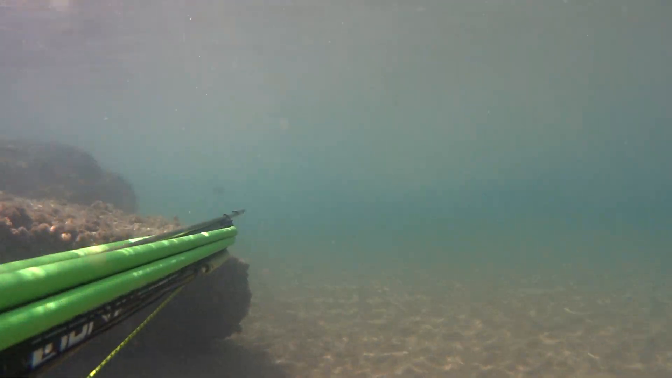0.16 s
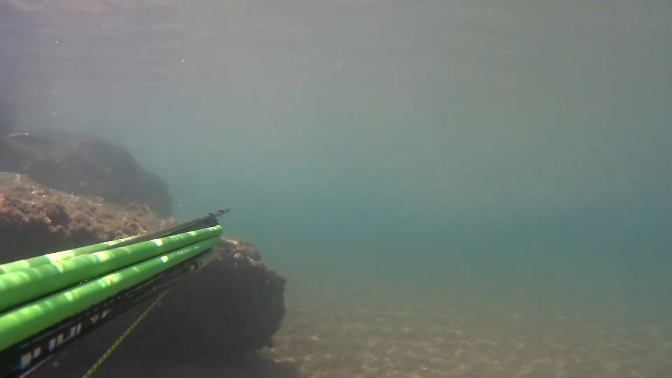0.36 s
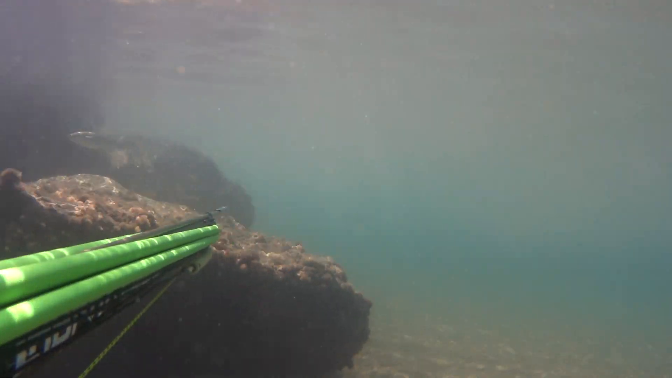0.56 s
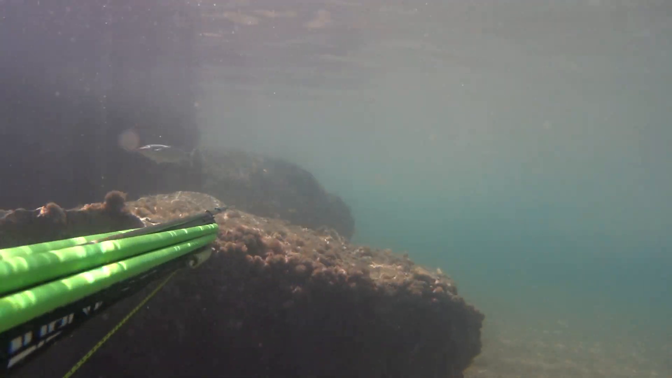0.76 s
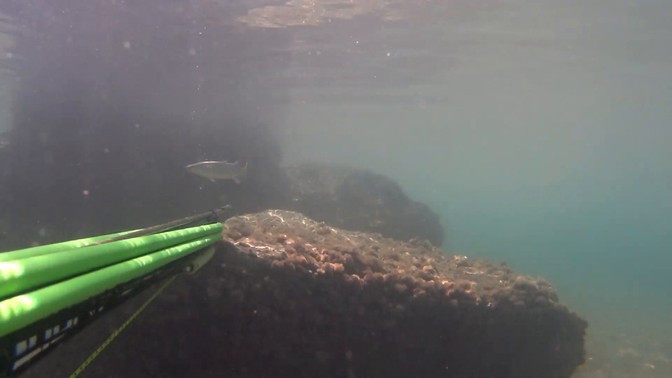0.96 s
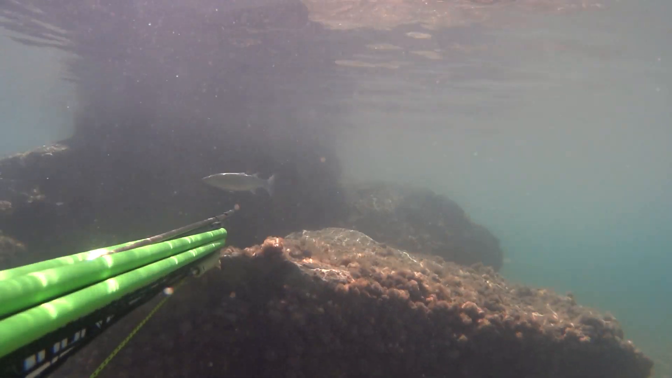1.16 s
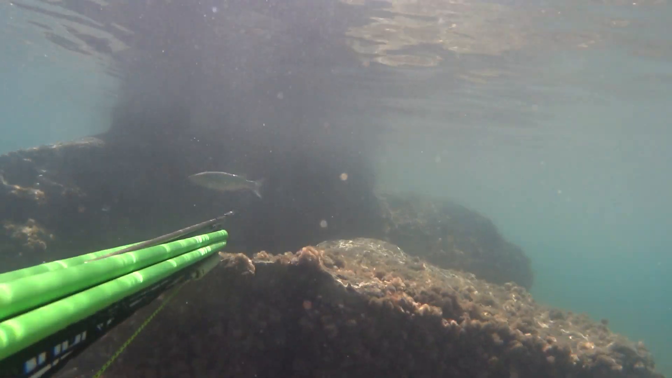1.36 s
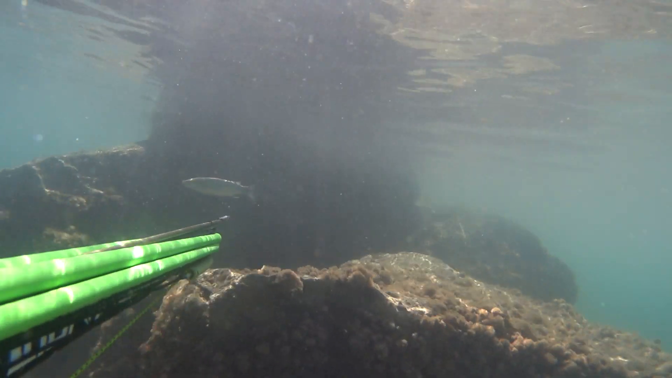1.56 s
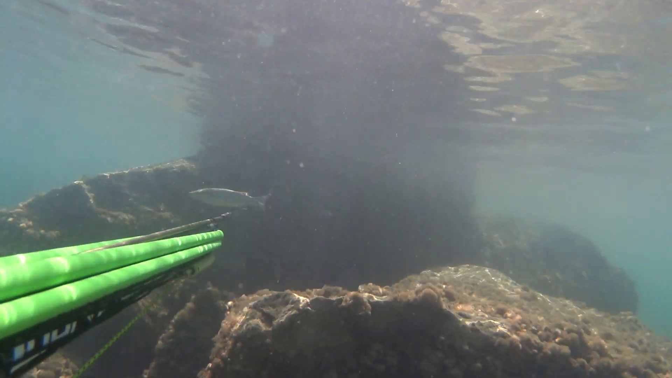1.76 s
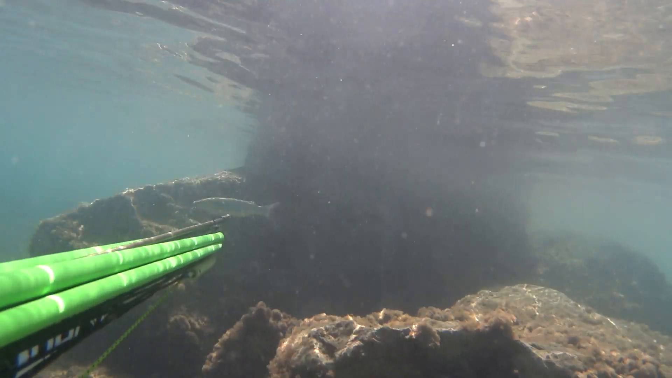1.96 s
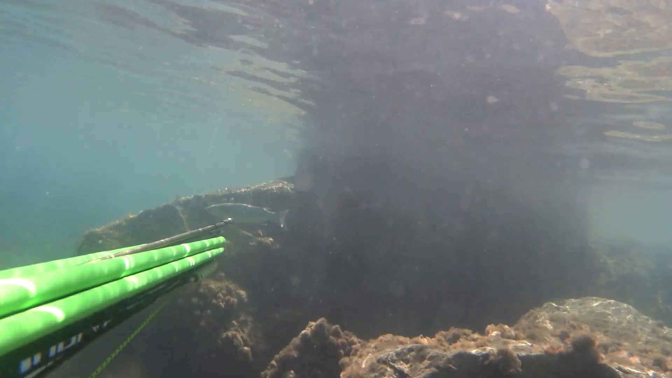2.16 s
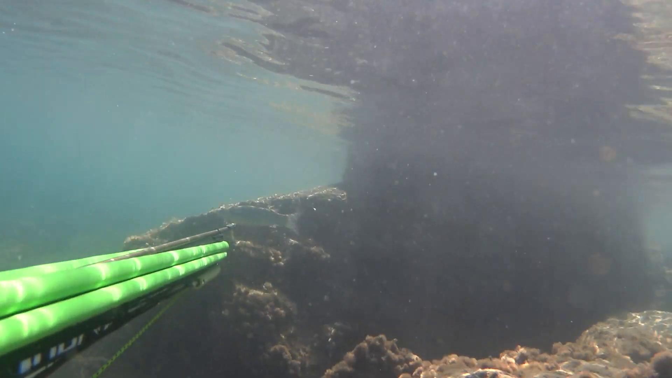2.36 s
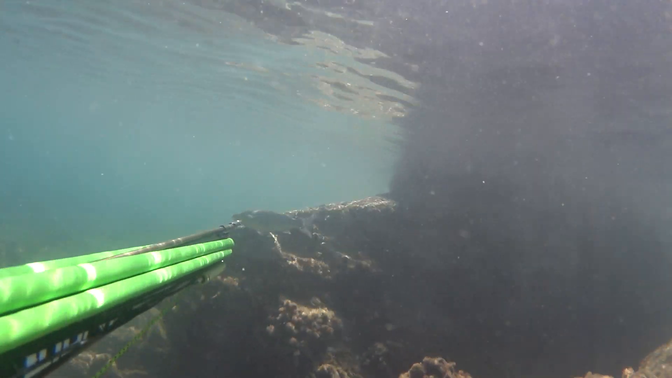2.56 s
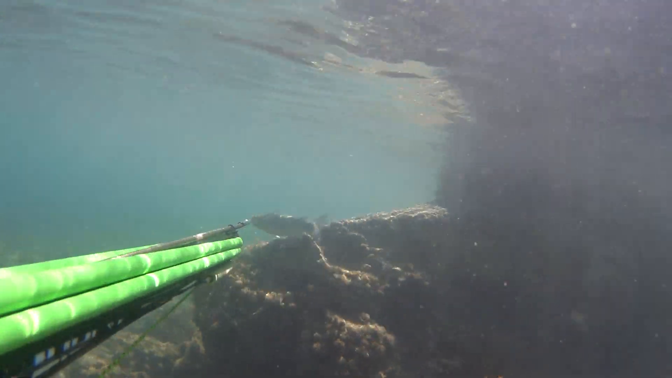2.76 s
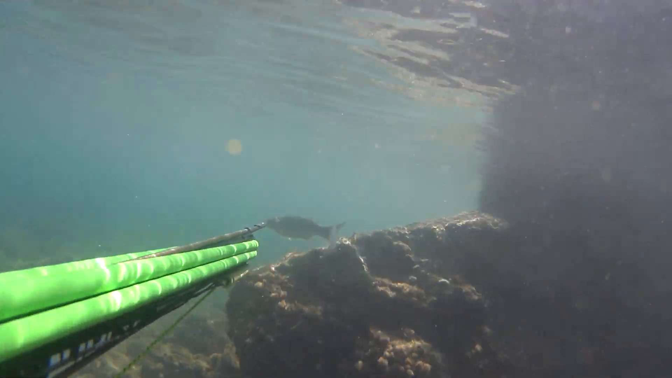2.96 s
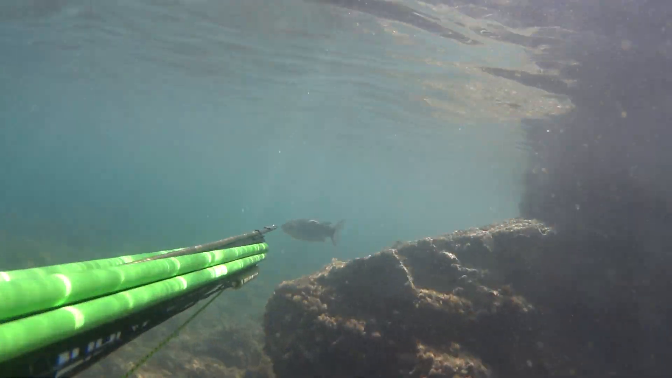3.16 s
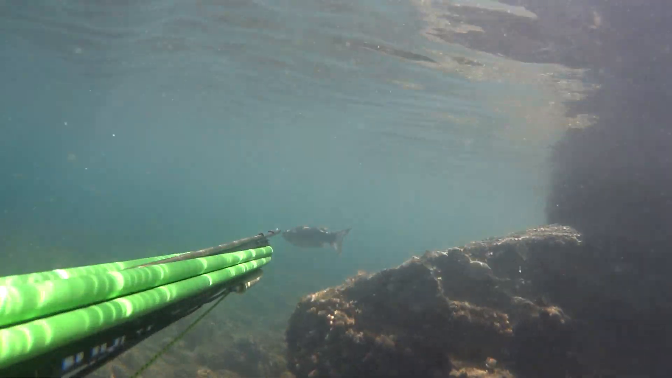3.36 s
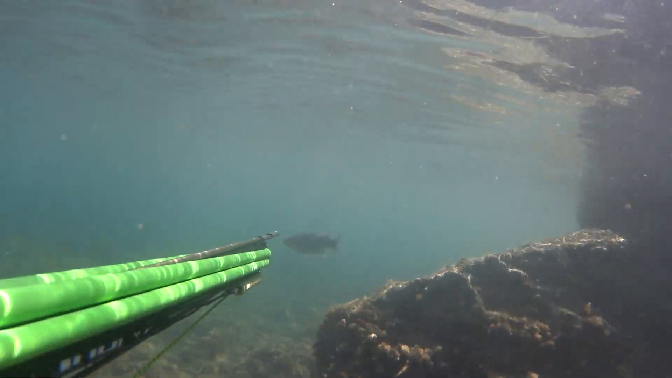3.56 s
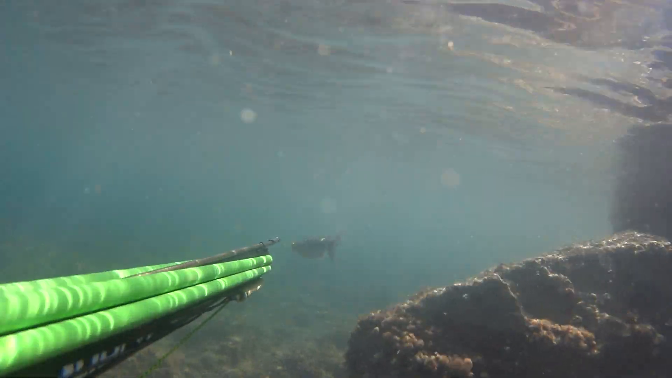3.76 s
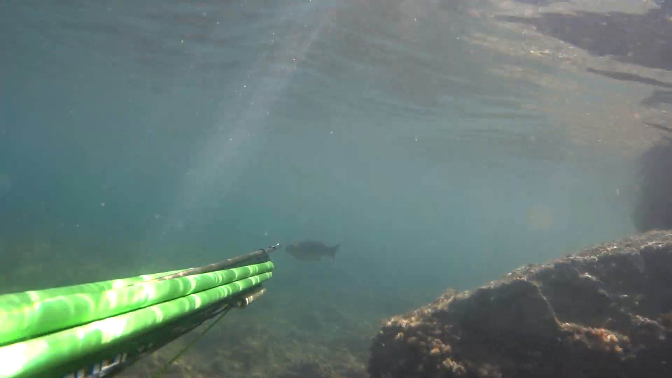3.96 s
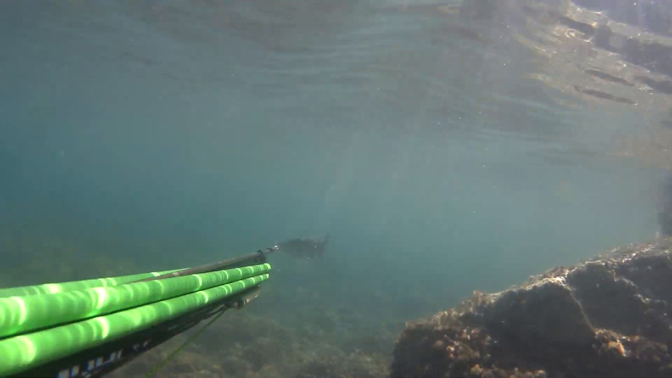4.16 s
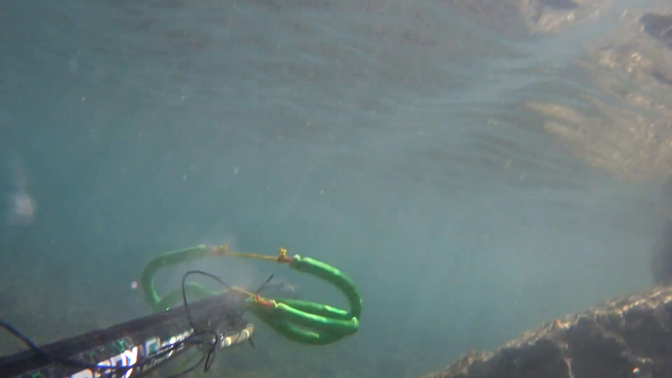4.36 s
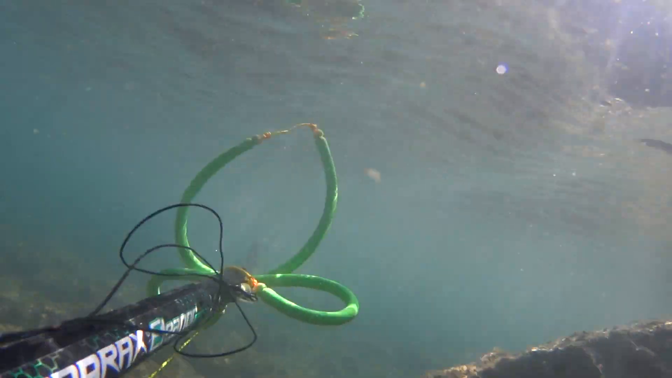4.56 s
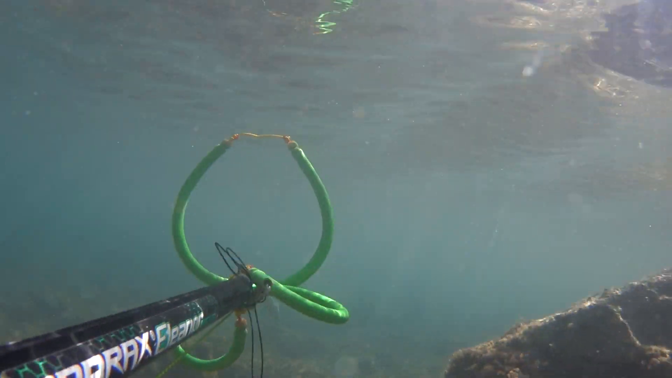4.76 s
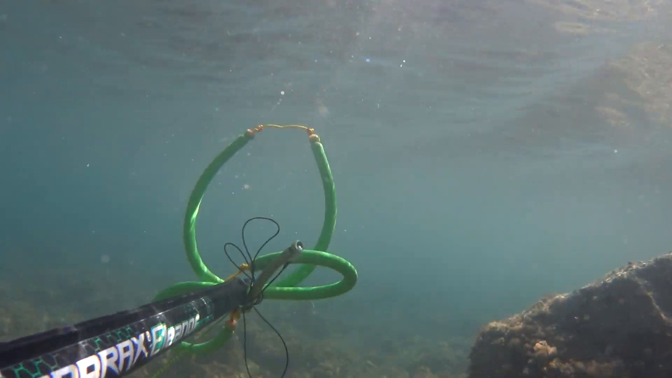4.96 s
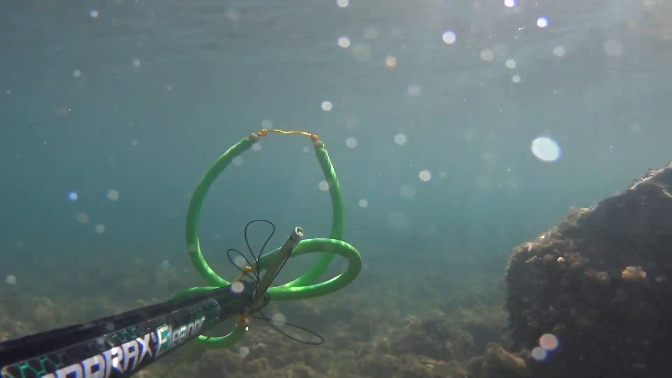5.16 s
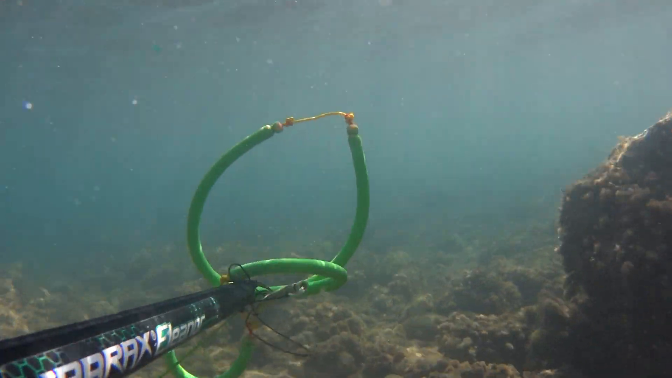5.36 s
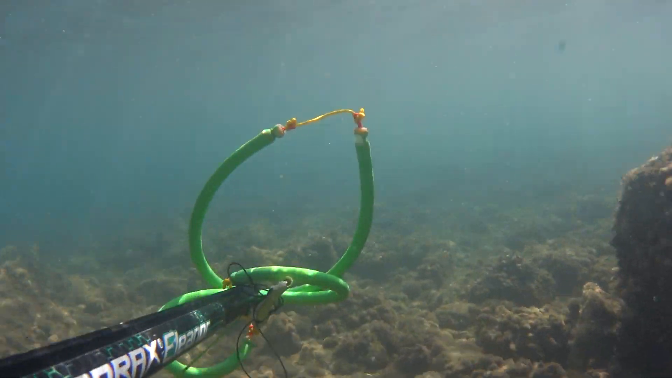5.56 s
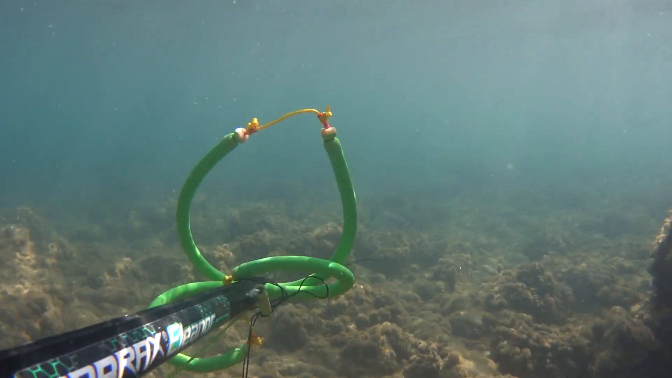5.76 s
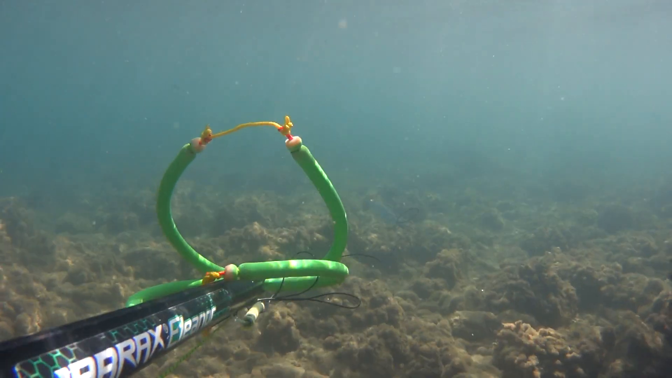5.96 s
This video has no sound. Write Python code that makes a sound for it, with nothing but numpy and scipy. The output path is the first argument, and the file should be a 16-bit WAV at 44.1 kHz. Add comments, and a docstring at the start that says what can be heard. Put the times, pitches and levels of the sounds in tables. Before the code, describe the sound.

Quiet shallow sea hiss and light handling rubs, a sudden hard speargun blast at mid-length, a second sharp snap, then loose knocks and rubbing.

```python
"""A rubber-band speargun is aimed and fired in shallow sea, heard from a waterproof housing fixed to the gun.
Over a steady hiss with faint sizzle (shaped noise and impulses), the grip rubs, and ticks and knocks ring damped modes.
The trigger clicks; the bands drive the shaft in a burst of churned water, rail rattle and collapsing cavities.
The line runs out ever louder and brighter, then snaps taut: it jerks the muzzle and leaves the steel ringing.
Knocks, hard contacts and handling of the slack gun follow."""
import sys
import numpy as np
from scipy import signal
from scipy.fft import rfft, irfft, next_fast_len
from scipy.io import wavfile

SR = 44100
rng = np.random.default_rng(int(sys.argv[2]) if len(sys.argv) > 2 else 0)


def put_to_file(sound):
    """Save the sound as 16-bit audio at rate SR, in the file named by the first command-line argument."""
    columns = np.atleast_2d(sound).T  # one column per channel
    safe = np.clip(columns, -1, 1)
    whole_steps = np.round(safe * 32767)
    wavfile.write(sys.argv[1], SR, whole_steps.astype(np.int16))


N = 265482

# resonances of the gun and its mount: pitch_hz, level_db, t60_s, phase_between_ports_rad
STOCK = [(135, -23, 0.11, 1.72), (257.8, -8, 0.12, 2.76), (319.8, -12.5, 0.083, .8),
         (431, -3.5, 0.036, 1.5), (509, -3.5, 0.045, 2.66), (666, -0.5, 0.034, 1.93),
         (777.4, 1.5, 0.031, 1.93)]
# resonances of the housing wall: pitch_hz, level_db, t60_s, phase_between_ports_rad
WALL = [(1005, -4.5, .014, 1.7), (1194, -3, 0.016, 1.72), (1360, 0, 0.025, 1.1), (1505, -10.5, 0.02, 1.5),
        (1765, -20, 0.024, 1.6)]
# spectrum of cavitation, cracks and scrapes: frequency_hz, level_db
FIZZ = [(1060, -31), (1800, -0.5), (2050, -5), (2380, -7.5), (3040, -13), (3450, -9), (4080, -14.5),
        (4970, -11), (5560, -13), (6090, -16.5), (11000, -33), (14300, -67), (22000, -120)]
# stereo width of moving water: frequency_hz, side_over_mid_db
THRUST_SIDE = [(40, -15), (70, -4.5), (150, -1.5), (300, -0.5), (600, 3), (1000, 2)]
FIRE_S = 4.344  # the shaft starts to move
TOP_HZ = 11150  # upper band limit, also the smallest cavities of the crackle


def amp(db):
    """Level: decibels become an amplitude ratio."""
    return 10 ** (np.asarray(db) / 20)


def unit(x):
    """Normalisation: x is brought to rms 1."""
    return x / np.sqrt(np.mean(x ** 2) + 1e-20)


def clock(length):
    """Time base: seconds since the start of a sound that is length samples long."""
    return np.arange(length) / SR


def along(points, hz):
    """Interpolation of (frequency, value) points on a logarithmic frequency axis."""
    f, v = np.transpose(points)
    return np.interp(np.log(hz + 1), np.log(f + 1), v)


def filtered(x, response):
    """Linear filtering: the spectrum of x is multiplied by a response of frequency."""
    size = x.shape[-1]
    padded = next_fast_len(size + 8192)
    spectrum = rfft(x, padded) * response(np.fft.rfftfreq(padded, 1 / SR))
    return irfft(spectrum, padded)[..., :size]


def coloured(x, spectrum):
    """Spectral shaping: x is weighted by the given spectrum and brought to rms 1."""
    return unit(filtered(x, lambda hz: amp(along(spectrum, hz))))


def wide(pair, spectrum, side):
    """Mid-side stereo: two unrelated signals become left and right of given spectrum and width, at rms 1."""
    mid = filtered(pair[0], lambda hz: 1 / np.sqrt(1 + amp(along(side, hz)) ** 2))
    diff = filtered(pair[1], lambda hz: 1 / np.sqrt(1 + amp(-along(side, hz)) ** 2))
    return coloured(np.array([mid + diff, mid - diff]), spectrum)


def add(out, start_s, sound, pan_db=0):
    """Superposition: a sound is mixed in at its start; positive pan favours the left."""
    start = round(start_s * SR)
    part = (sound * amp([[pan_db / 2], [-pan_db / 2]]))[:, :N - start]
    out[:, start:start + part.shape[1]] += part


def placed(start_s, sound):
    """Superposition on silence: the sound alone, from its start."""
    out = np.zeros((2, N))
    add(out, start_s, sound)
    return out


def decay(t, t60):
    """Exponential damping: the amplitude falls by 60 dB in t60 seconds."""
    return np.exp(-np.log(1000) * t / t60)


def burst(age, attack, hold, t60, slope_db=0):
    """Attack, hold and decay: rises from age 0, holds while changing by slope_db a second, then dies away."""
    held = np.clip(age - attack, 0, hold)
    after = np.maximum(age - attack - hold, 0)
    return np.clip(age / attack, 0, 1) * amp(slope_db * held - 60 * after / t60)


def swell(age, rise, fall):
    """Exponential growth to 1 at age 0 and exponential ebb, with time constants in seconds."""
    return np.exp(-np.maximum(-age / rise, age / fall))


def ring(modes, attack=0.00061, vary_db=2, detune=.03):
    """Modal synthesis: one blow swells into damped modes, peak 1, each reaching the two ports out of step."""
    t = clock(SR // 6)
    out = np.zeros((2, len(t)))
    for hz, db, t60, lag in modes:
        size, shift, start = rng.standard_normal(3)
        phase = start + np.array([[-lag / 2], [lag / 2]])
        mode = np.sin(2 * np.pi * hz * (1 + detune * shift) * t + phase)
        out += amp(db + vary_db * size) * decay(t, t60) * mode
    out *= (1 - np.exp(-t / attack)) ** 2
    return out / np.abs(out).max()


def tilted(modes, db_per_octave):
    """Contact hardness: a harder blow excites the upper modes more, a softer one less."""
    return [(hz, db + db_per_octave * np.log2(hz / modes[0][0]), t60, lag) for hz, db, t60, lag in modes]


def grains(rate, spread_db, size=N):
    """Random point process: impulses at a mean rate per second, of uneven size and sign."""
    out = np.zeros(size)
    at = np.flatnonzero(rng.random(size) < rate / SR)
    signs = np.sign(rng.random(size)[at] - .5)
    out[at] = signs * amp(spread_db * rng.standard_normal(size)[at])
    return out


def chatter(modes, rate, spread_db, size, count=5):
    """Convolution of blows with modes: dense small impacts at several spots on one body, rms 1."""
    total = np.zeros((2, size))
    for _ in range(count):
        blows = grains(rate / count, spread_db, size)[None]
        total += signal.oaconvolve(blows, ring(modes), axes=1)[:, :size]
    return unit(total)


def rubbing(stock, wall, scrape_db, rate, spread_db):
    """Friction by tiny catches: hand or line slips along the gun and rings stock and wall at the given gains."""
    size = len(stock)
    scrape = coloured(np.array([grains(10 * rate, 4, size) for port in range(2)]), FIZZ)
    wall_sound = chatter(WALL, rate, 2.5, size) + amp(scrape_db) * scrape
    return stock * chatter(STOCK, rate, spread_db, size) + wall * wall_sound


def flow(speed):
    """Flow noise: a low swirl of water round the moving housing follows its speed."""
    # frequency_hz, level_db
    swirl_spectrum = [(20, -25.5), (45, -12), (80, -5), (125, 0), (200, -11), (400, -43)]
    return speed * wide(rng.standard_normal((2, len(speed))), swirl_spectrum, THRUST_SIDE)


def crackle(rate, spread_db, cycles, size, count=12):
    """Cavity resonance: tiny cavities of many sizes each ring for a few cycles."""
    out, t = np.zeros((2, size)), clock(SR // 100)
    for hz in np.geomspace(1800, TOP_HZ, count):
        tone = np.sin(2 * np.pi * hz * t + rng.normal(0, 1, (2, 1)))
        pop = hz * np.exp(-hz * t / cycles) * tone
        out += signal.oaconvolve(grains(rate / 2, spread_db, size)[None], pop, axes=1)[:, :size]
    return out


def sea(hiss_db=-60, sizzle_db=-76):
    """Ambient noise: a steady soft hiss with the sizzle of many far snaps, a sum of random impulses."""
    # spectrum of the hiss: frequency_hz, level_db
    hiss_spectrum = [(25, -44), (80, -26), (160, -15.5), (314, -8.5), (450, -6), (820, -6.5), (1450, -8.5),
                     (2500, -13.5), (5000, -22), (10500, -28.5)]
    # stereo width of the hiss: frequency_hz, side_over_mid_db
    hiss_side = [(60, -2.5), (110, 1), (190, 5.5), (350, 7), (620, 4), (1120, 6.5), (2010, 5), (3610, 1.5),
                 (6480, -3), (11600, -8)]
    hiss = wide(rng.standard_normal((2, N)), hiss_spectrum, hiss_side)
    sizzle = coloured(np.array([grains(250, 4.6), grains(250, 5)]), FIZZ)
    return amp(hiss_db) * hiss + amp(sizzle_db) * sizzle


def handling(stock_db=-3, wall_db=-9, swirl_db=-15.5, rest_stock_db=-72, rest_wall_db=-73):
    """Common excitation: the hand's speed drives both grip friction and swirl; the grip is never quite still."""
    # movements that aim and steady the gun: fastest_s, speed_db, rise_s, fall_s
    moves = [(0.69, -57.5, .24, .24), (1.135, -53.5, .015, .035), (1.285, -50, 0.053, 0.14),
             (5.06, -58, 0.11, .08), (5.34, -52.5, 0.13, 0.15), (5.78, -53, 0.039, 0.097),
             (5.99, -51, 0.053, .15)]
    t = clock(N)
    speed = sum(amp(db) * swell(t - fastest_s, rise, fall) for fastest_s, db, rise, fall in moves)
    stock = amp(stock_db) * speed + amp(rest_stock_db)
    wall = amp(wall_db) * speed + amp(rest_wall_db)
    return rubbing(stock, wall, scrape_db=-12.5, rate=350, spread_db=5.0) + flow(amp(swirl_db) * speed)


def small_contacts(tick_db=2, tick_stock_db=-2, tick_pan_db=-5, knock_db=2.5, knock_wall_db=1,
                   neutral_db=-19, brightening=0.23):
    """Impact excitation: sharp ticks mostly ring the wall, soft knocks the stock; harder knocks are brighter."""
    # light ticks in the water, before the gains above: start_s, level_db, stock_over_wall_db
    ticks = [(0.7636, -46.5, -16), (1.5808, -45.5, -22), (1.59, -44.5, -18), (2.2816, -46.5, -15),
             (2.424, -45.5, -15), (2.528, -44.5, -24), (2.607, -51, -3), (2.6623, -54.5, -16),
             (2.8427, -44, -26), (2.9404, -53, 4.5), (3.093, -44.5, -26), (3.924, -55, 1),
             (4.1806, -41, -18)]
    # knocks of hand, rubbers and line on the gun, before the gains above:
    # start_s, level_db, wall_over_stock_db (the hardness)
    knocks = [(1.12, -41.5, -11), (1.131, -41, -13), (1.363, -39, -30), (1.404, -38.5, -13),
              (1.427, -40, -21), (1.469, -44.5, -18), (4.5595, -23.5, -26), (4.635, -27.5, -10.5),
              (4.684, -29.5, -6), (4.825, -18.5, -17), (4.933, -40, -7.5), (4.976, -45, -10),
              (5.259, -39.5, -6.5), (5.316, -42, -11), (5.369, -39, -8.5), (5.522, -40.5, -13),
              (5.563, -44.5, -13), (5.764, -43.5, -13), (5.921, -28.5, -25), (5.932, -38, -20)]
    out = np.zeros((2, N))
    for start_s, db, stock_db in ticks:
        wall = ring(WALL, vary_db=3.5, detune=0.011)
        stock = amp(stock_db + tick_stock_db) * ring(STOCK)
        add(out, start_s, amp(db + tick_db) * (wall + stock), tick_pan_db)
    for start_s, db, wall_db in knocks:
        stock = ring(tilted(STOCK, brightening * (wall_db - neutral_db)), attack=0.0016)
        wall = amp(wall_db + knock_wall_db) * ring(WALL, attack=0.00071)
        add(out, start_s, amp(db + knock_db) * (stock + wall))
    return out


def hard_contacts(crack_t60=0.015, crack_db=-9, ring_db=1, hardness_db=2):
    """Hard impact: shaft, taut line and fittings strike the gun, a short bright crack on top of both rings."""
    # before the gains above: start_s, level_db, stock_over_wall_db, crack_db, left_over_right_db
    contacts = [(1.2977, -37.5, 8.5, -12, -2), (1.3237, -37.5, 11, -15, 0), (2.264, -52.5, 2, 7, -1),
                (4.3452, -23.5, 11.5, 7, -1), (4.354, -8, -0.5, -17, 5), (4.3684, -11, 7, -0.5, -3),
                (4.377, -6, -5.5, -0.5, 1), (4.3903, -11.5, -4, -18, -1.5), (4.4025, -17, 8, -1, 8),
                (4.463, -22, 5, -5, 5), (4.4814, -22, 2.5, -3, -3), (4.511, -44, 16, 11, 5),
                (4.537, -37.5, -1, 7, 4), (4.727, -26, -9.5, -24, -6.5), (4.740, -26.5, -2, -13, -5),
                (4.764, -25, 0, -17, -1), (4.783, -26, -5, -3.5, -12), (4.840, -23.5, -9, -33, -4),
                (5.041, -42.5, -5, -15, 0), (5.504, -46.5, 0, -14, -3), (5.736, -40, 1, 3, 2),
                (5.948, -36, -6.5, -9, -3)]
    out, t = np.zeros((2, N)), clock(SR // 6)
    for start_s, db, stock_db, bright_db, pan_db in contacts:
        crack = coloured(rng.standard_normal((2, len(t))), FIZZ) * decay(t, crack_t60)
        body = ring(WALL) + amp(stock_db) * ring(tilted(STOCK, hardness_db))
        sound = amp(ring_db) * body + amp(bright_db + crack_db) * crack
        add(out, start_s, amp(db) * sound, pan_db)
    return out


def trigger(start_s=4.3326, click_db=-15, hz=1500, t60=.012, crack_db=-33, crack_rise=.001, crack_fall=.0025):
    """Single-mode impact: the sear lets go with one clear click just before the shaft moves."""
    t = clock(SR // 6)
    noise = coloured(rng.standard_normal((2, len(t))), FIZZ)
    crack = swell(t - 2 * crack_rise, crack_rise, crack_fall) * noise
    out = placed(start_s, amp(crack_db) * crack)
    click = ring([(hz, 0, t60, .9)], attack=0.0011, detune=.005)
    add(out, start_s, amp(click_db) * click, -4)
    return out


def launch(thrust_db=-15, rail_db=-16.0, rail_delay=.015, slap_db=-25, slap_rattle_db=-27, slap_delay=0.086,
           fizz_db=-33):
    """Flow noise, impacts and cavitation: rubbers churn water and slap the muzzle, the shaft rattles on its rail."""
    # spectrum of the churned water: frequency_hz, level_db
    thrust_spectrum = [(25, -20.5), (70, -17.5), (130, -9), (200, -7), (310, -0.5), (450, -0.5), (750, -1),
                       (930, -10), (1100, -11.5), (1450, -29), (2400, -100)]
    t = clock(SR // 2)
    thrust = amp(thrust_db) * burst(t, attack=0.026, hold=0.036, t60=.27)
    rail = amp(rail_db) * burst(t - rail_delay, attack=0.018, hold=.008, t60=.18)
    slap = amp(slap_db) * burst(t - slap_delay, attack=.006, hold=0.019, t60=.27)
    slap_rattle = amp(slap_rattle_db) * burst(t - slap_delay, attack=.016, hold=0.029, t60=0.075)
    cavitation = amp(fizz_db) * burst(t, attack=0.0098, hold=.14, t60=.13, slope_db=-60)
    blows = np.array([grains(900, 2.5, len(t)) for port in range(2)])
    churn = wide(blows, thrust_spectrum, THRUST_SIDE)
    rattle = chatter(WALL, 700, 2.8, len(t))
    fizz = coloured(crackle(rate=1000, spread_db=4.5, cycles=2.8, size=len(t)), FIZZ)
    return placed(FIRE_S, (thrust + slap) * churn + (rail + slap_rattle) * rattle + cavitation * fizz)


def recoil(shove_db=-32, kick_delays=(.061, .109), rise=.017, fall=.012):
    """Reaction: the gun kicks as the shaft leaves and as the rubbers stop, and shoves water past the housing."""
    t = clock(SR // 2)
    shove = sum(swell(t - delay, rise, fall) for delay in kick_delays)
    return placed(FIRE_S, flow(amp(shove_db) * shove))


def bubbles(life=0.0022, rise=0.037):
    """Cavity resonance: each larger collapsing cavity swells in and rings briefly, rising a little in pitch."""
    # start_s, level_db, pitch_hz at the start
    cavities = [(4.3465, -24.5, 5020), (4.4025, -26, 3580), (4.465, -30.5, 2440), (4.496, -35.5, 3720),
                (4.51, -37.5, 3950), (4.5255, -38.5, 3350)]
    out, t = np.zeros((2, N)), clock(SR // 40)
    age = t / life
    envelope = 2 * np.e * age * np.exp(-2 * age)  # peaks at 1 after half a life
    for start_s, db, hz in cavities:
        phase = 2 * np.pi * hz * (t + rise * t * age / 10) + rng.normal(0, 0.87, (2, 1))
        add(out, start_s, amp(db) * envelope * np.sin(phase))
    return out


def line_run(start_s=4.51, stock_db=-43, wall_db=-53.5, swirl_db=-68):
    """Friction and flow noise: the line pays out behind the shaft, ever louder and brighter, then dies away."""
    t = clock(SR)
    stock = amp(stock_db) * burst(t, attack=0.026, hold=0.27, t60=0.29, slope_db=17.5)
    wall = amp(wall_db) * burst(t, attack=.02, hold=.24, t60=.42, slope_db=41)
    swirl = amp(swirl_db) * burst(t, attack=.02, hold=0.3, t60=0.21, slope_db=66.5)
    return placed(start_s, rubbing(stock, wall, scrape_db=-16.5, rate=650, spread_db=3) + flow(swirl))


def line_snap(taut_s=4.7684, jerk_db=-3, pan_db=-5.0, crack_db=-27, crack_width=.0025, lag=0.0018,
              steel_db=-45, creak_db=-24, jolt_db=-27):
    """Impulse on a resonant body: the taut line jerks the muzzle, cracks, jolts the stock and rings the steel."""
    # resonances of the jerked muzzle: pitch_hz, level_db, t60_s, phase_between_ports_rad
    muzzle = [(301, -24.5, 0.06, 2.6), (673, -19, 0.09, 1.5), (910, -9, .02, 1.3), (1318, 0, .024, 1.1),
              (1965, -16, 0.029, 1.4), (2310, -24.5, 0.027, 1.2)]
    # resonances of the steel shaft, before steel_db: pitch_hz, level_db, t60_s
    steel = [(1890, 0.5, 0.35), (3774, -10, 0.1), (5800, -12, .15), (7671, -18, .16), (9500, -11, .09)]
    lead = .05  # seconds of build-up ahead of the jerk
    t = clock(SR // 2)
    # crack and creak build as the line stretches and peak just after the jerk starts
    crack = amp(crack_db) * coloured(rng.standard_normal((2, len(t))), FIZZ)
    creak = amp(creak_db) * chatter(WALL, 900, 3, len(t))
    stretch = swell(t - lead - lag, crack_width, crack_width)
    jolt = amp(jolt_db) * swell(t - lead, rise=.006, fall=0.009) * chatter(STOCK, 900, 3, len(t))
    out = placed(taut_s - lead, stretch * (crack + creak) + jolt)
    jerk = ring(muzzle, attack=0.00094, vary_db=1, detune=.005)
    add(out, taut_s, amp(jerk_db) * jerk, pan_db)
    for hz, mode_db, t60 in steel:
        phase = 2 * np.pi * hz * t + rng.normal(0, .6, (2, 1))
        add(out, taut_s, amp(steel_db + mode_db) * decay(t, t60) * np.sin(phase))
    return out


def scene():
    """Superposition of all sources: the stalk, the shot and the slack gun afterwards."""
    shot = trigger() + launch() + recoil() + bubbles() + line_run() + line_snap()
    return sea() + handling() + small_contacts() + hard_contacts() + shot


def record(dry):
    """Band limiting and soft saturation: deep bass is cut, peaks near full scale rounded, the top cut steeply."""
    high_pass = signal.butter(2, 30, "highpass", fs=SR, output="sos")  # corner in Hz
    thin = signal.sosfilt(high_pass, dry)
    rounded = thin / (1 + thin ** 6) ** (1 / 6)
    return filtered(rounded, lambda hz: 1 / np.sqrt(1 + (hz / TOP_HZ) ** 160))


dry = scene()
out = record(dry)
put_to_file(out)
```